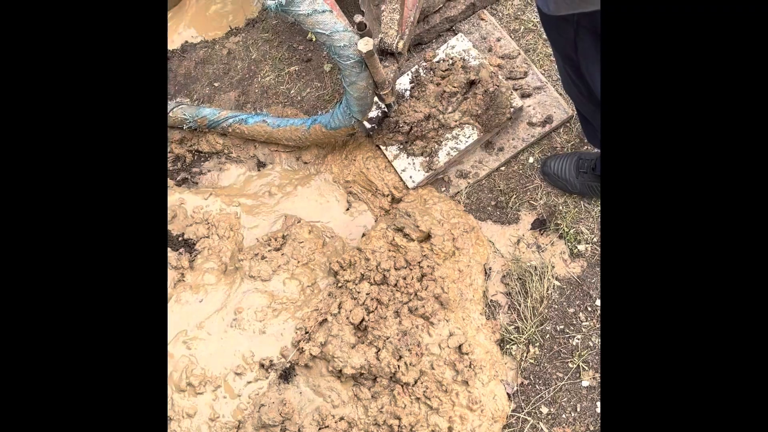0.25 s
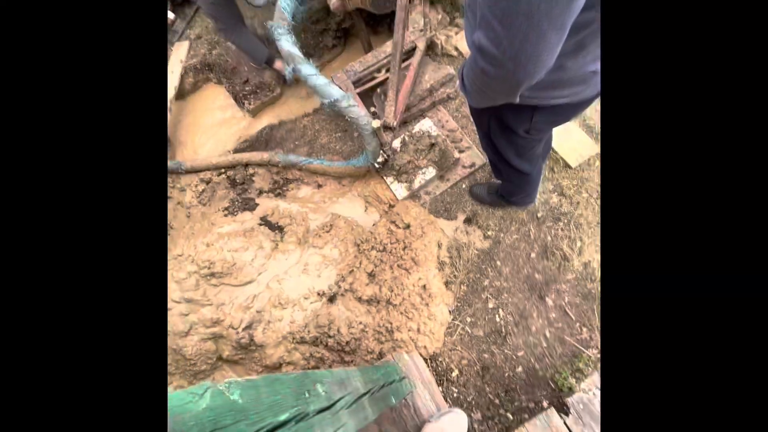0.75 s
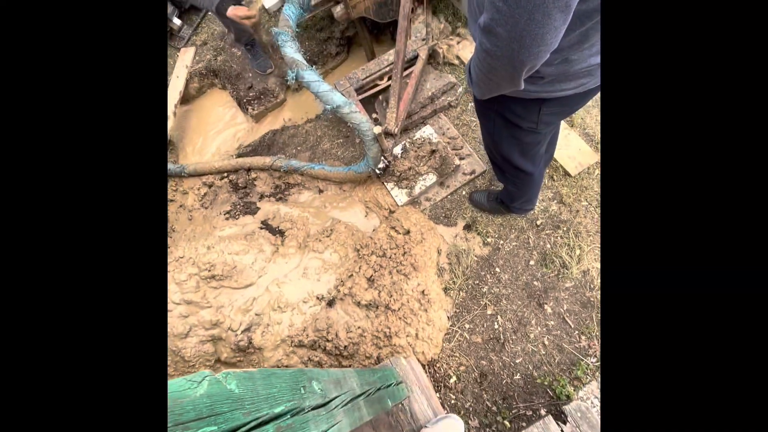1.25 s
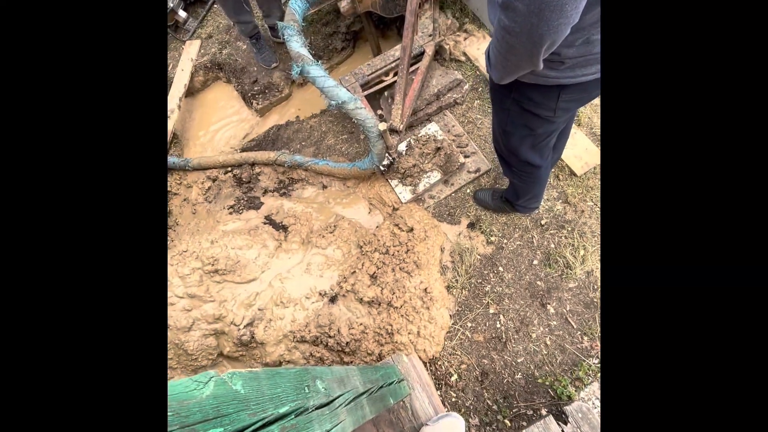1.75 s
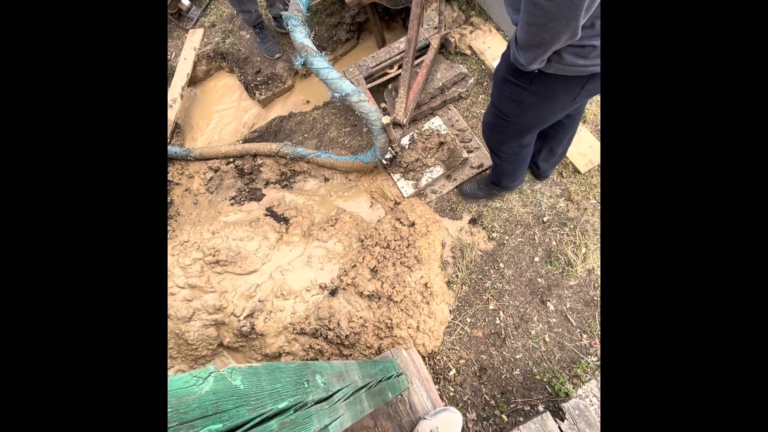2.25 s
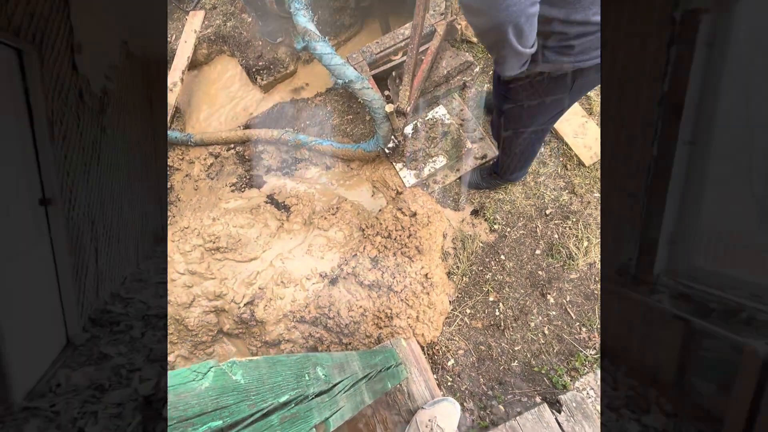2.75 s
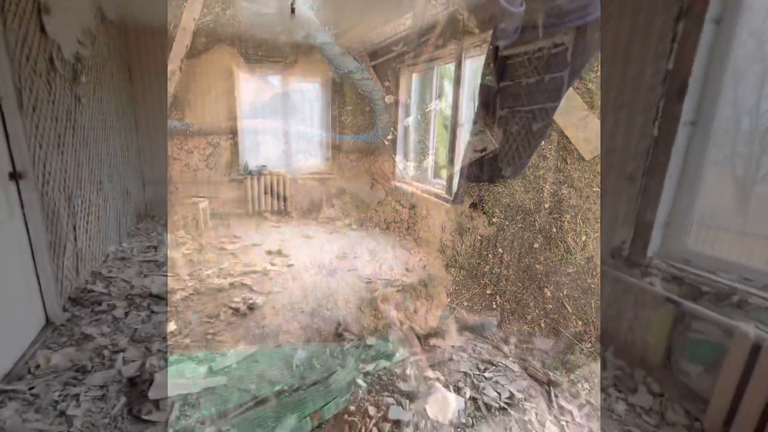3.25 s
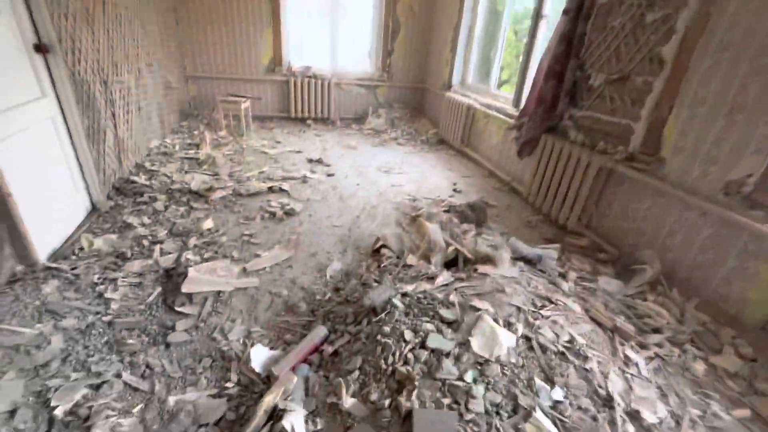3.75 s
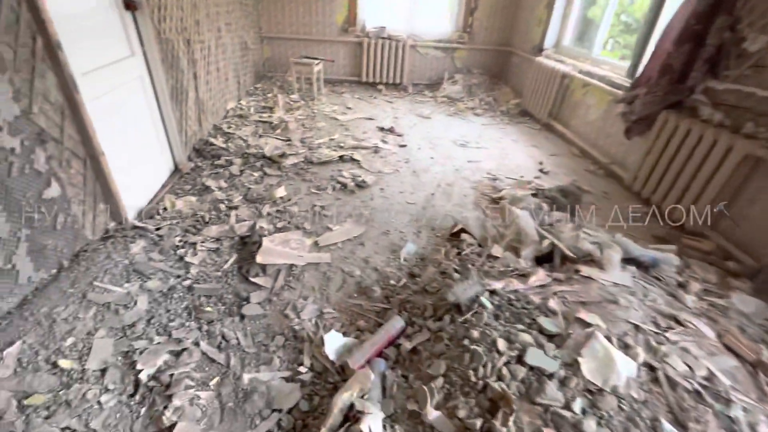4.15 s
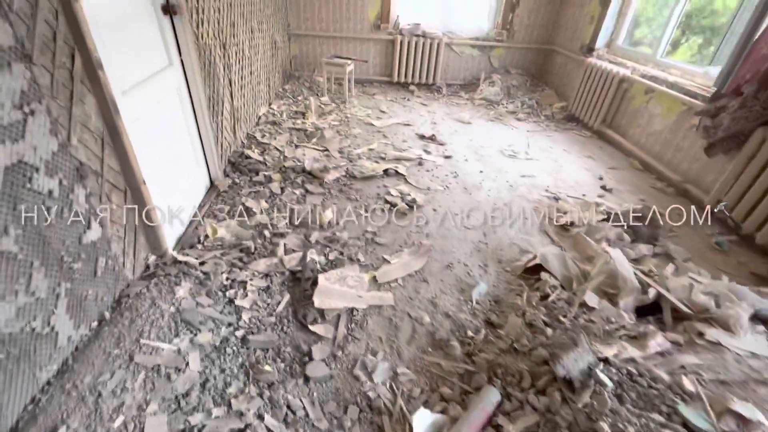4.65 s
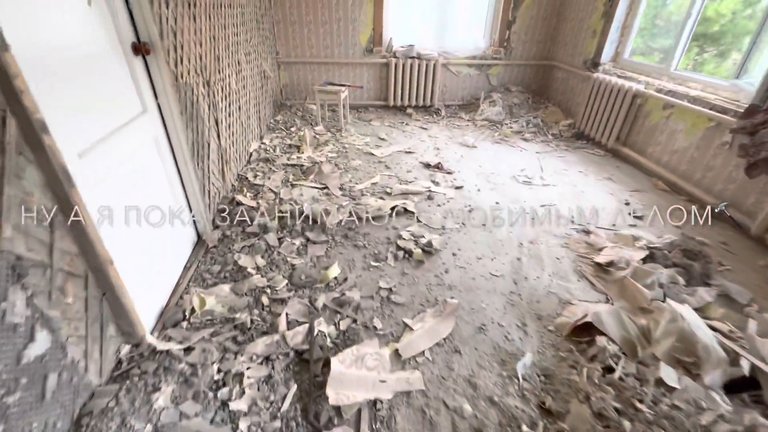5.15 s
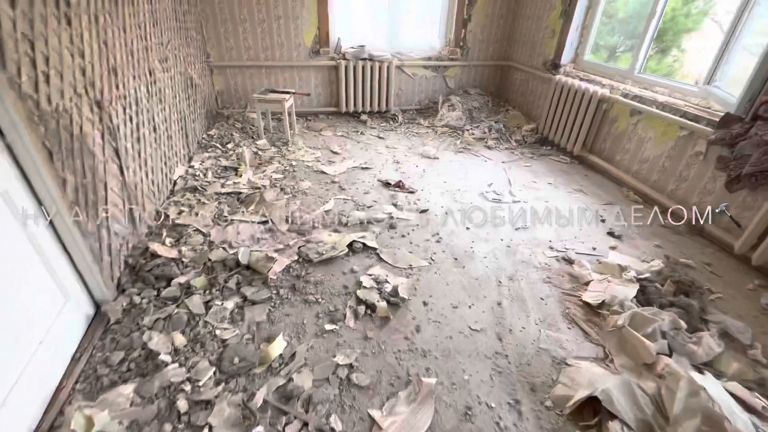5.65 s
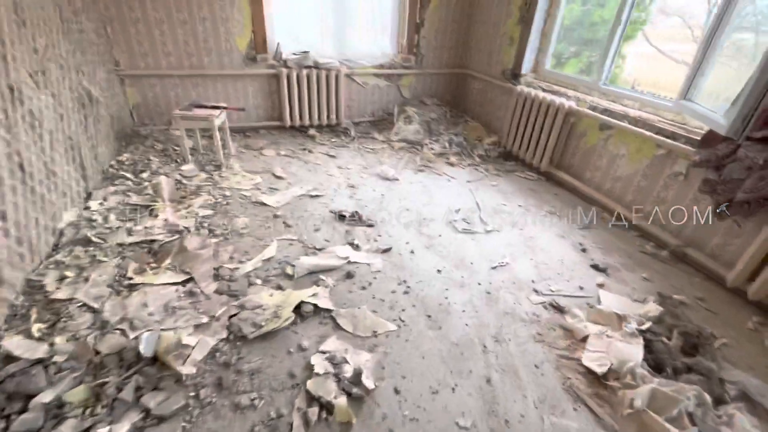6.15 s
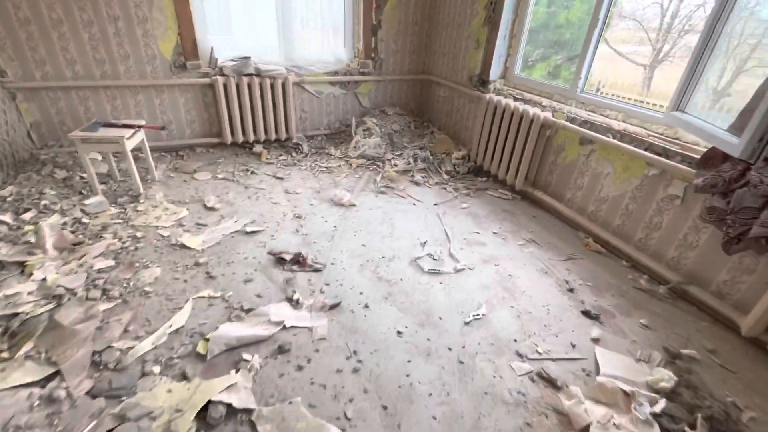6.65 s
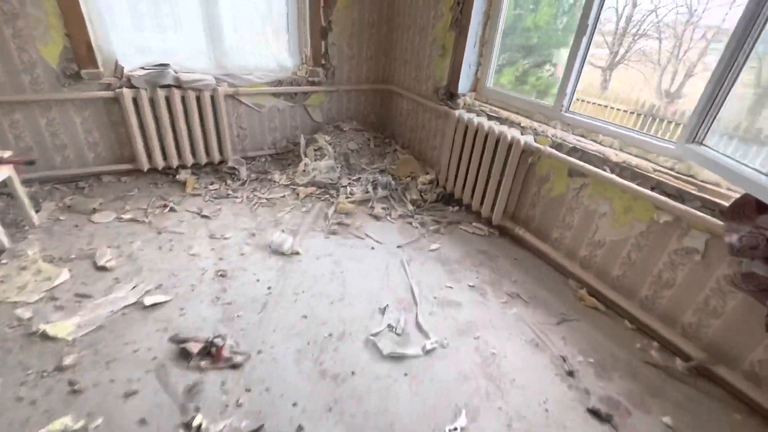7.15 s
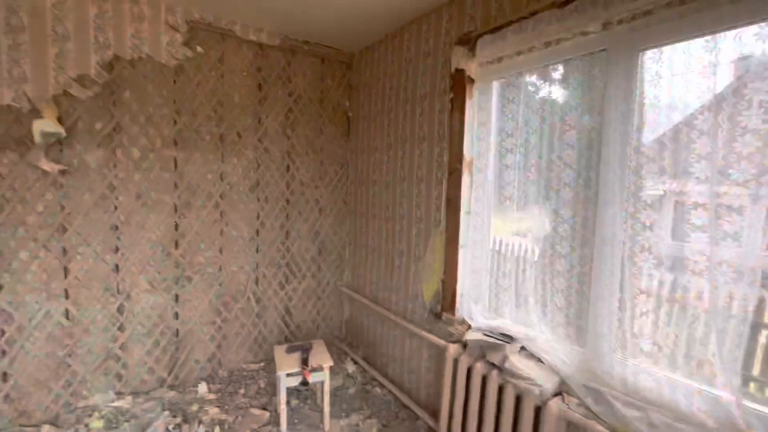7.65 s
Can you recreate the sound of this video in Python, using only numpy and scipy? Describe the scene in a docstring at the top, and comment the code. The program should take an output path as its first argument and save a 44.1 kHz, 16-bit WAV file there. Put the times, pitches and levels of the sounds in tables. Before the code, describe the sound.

A single-cylinder engine driving a drilling rig chugs fast and loud close by in a yard, with pump throb, metallic clatter and high hiss. The microphone backs off slightly, then the machine fades smoothly under a quiet bare room. Someone walks slowly over debris: dull board thuds, gritty plaster crunches, snapping chips, a skittering shard, a rocking slab knocking, and a final dry crack.

```python
"""Drilling rig in a yard, then steps in a derelict room

A one-cylinder engine drives a well-drilling rig, with a mud pump and a drive beating against it: summed
harmonics, with noise and ringing metal that swell at each firing. The rig fades away; then someone walks
through a bare room. Each step thuds on ringing boards and crunches plaster and paper as bursts of grainy
noise; chips snap as resonant clicks, a loose slab rocks in damped modes and clothes rustle."""
import sys
import numpy as np
from scipy import signal
from scipy.fft import rfft, irfft
from scipy.io import wavfile

SR = 44100
rng = np.random.default_rng(int(sys.argv[2]) if len(sys.argv) > 2 else 0)


def dump_mix(stems):
    """Bounce the given channels to the path in sys.argv[1] as a 16-bit WAV at rate SR."""
    frames = np.atleast_2d(stems).T  # one column per channel
    limited = np.clip(frames, -1, 1)  # hard clip at full scale
    pcm = np.round(limited * 32767).astype(np.int16)
    wavfile.write(sys.argv[1], SR, pcm)


N = 348829
T, HZ = np.arange(N) / SR, np.fft.rfftfreq(N, 1 / SR)

# stereo likeness of left and right for the rig: (frequency [Hz], likeness [-1..1])
RIG_SAME = [(60, 0.77), (300, 0.89), (550, 0.25), (850, 0.13), (1100, 0.72), (1500, 0.32), (3500, 0.18),
            (5000, 0.57), (6100, 0.91), (7200, 0.81), (9000, 1), (11000, 1)]
# stereo likeness of left and right for the room: (frequency [Hz], likeness [-1..1])
ROOM_SAME = [(60, 0.79), (290, 0.9), (700, 0.65), (1400, 0.98), (3100, 0.037), (7000, 0.081), (12000, 0.9)]
# phase between left and right for the room: (frequency [Hz], phase [rad])
ROOM_PHASE = [(0, 0), (900, 1.3), (1500, 1), (2800, 2.4), (5000, 7), (7200, 12), (10500, 12.6),
              (16000, 12.6)]
# a heel or a sole coming down on rubble: (time [s], floor thud [dB], crushing [dB], fine grit [dB],
# rise [s], decay [s], pitch [factor], jumps in level [dB])
STEPS = [ (3.533, -46, -36, -39, 0.022, 0.067, 0.98, 0), (3.59, -51, -60, -43, 0.017, 0.053, 1.3, 1),
         (3.7, -49, -52, -42.5, 0.047, 0.042, 1.4, -2), (4.291, -43, -27.5, -33.5, 0.012, 0.033, 1.1, 2),
         (4.319, -38, -31.5, -35, 0.003, 0.073, 0.89, 2.5), (4.375, -38, -37, -46, 0.014, 0.093, 0.63, 0),
         (4.512, -36.5, -29, -31.5, 0.003, 0.028, 1.34, 2),
         (4.558, -39.5, -41, -56, 0.0054, 0.057, 0.82, 1), (5.17, -49, -38.5, -47, 0.016, 0.059, 0.71, 0),
         (5.871, -38, -39.5, -41.5, 0.011, 0.17, 0.7, 1.5),
         (5.944, -35.5, -41, -42, 0.0024, 0.077, 0.98, 3),
         (6.553, -46, -47, -33.5, 0.0015, 0.058, 1.06, 1.5),
         (6.6, -60, -28.5, -30, 0.013, 0.06, 0.92, -0.5), (6.635, -60, -32.5, -38, 0.023, .04, 0.76, 4),
         (6.675, -54, -39, -31.5, 0.027, 0.026, 0.61, 0.5), (7.187, -43, -44, -36.5, 0.0063, 0.1, 0.7, 0.5),
         (7.313, -38, -34, -42, 0.0086, 0.053, 1.26, 2)]


def gain_of(db):
    """Decibels to amplitude."""
    return 10 ** (np.asarray(db) / 20)


def evened(x):
    """Scaled to rms 1."""
    return x / np.sqrt(np.mean(x ** 2) + 1e-20)


def read(points, hz):
    """A table over log frequency."""
    f, value = np.transpose(points)
    return np.interp(np.log(hz + 1), np.log(f + 1), value)


def curve(rows):
    """A table over time."""
    return np.interp(T, *np.transpose(rows))


def ramp(start, full):
    """A straight fade from 0 at start to 1 at full; it runs backwards if full comes first."""
    return np.clip((T - start) / (full - start), 0, 1)


def swell(s, half_width):
    """A smooth bump of height 1 around s."""
    return np.exp(-((T - s) / half_width) ** 2)


def coloured(x, spectrum):
    """Gives x a spectrum, at rms 1."""
    return evened(irfft(rfft(x) * gain_of(read(spectrum, HZ)), N))


def wander(hz):
    """Slow chance of rms 1, up to about hz."""
    return evened(irfft(rfft(rng.standard_normal(N)) * np.exp(-(HZ / hz) ** 2), N))


def pair(x, likeness):
    """Makes two unrelated channels partly alike."""
    a, b = rfft(x)
    same = np.clip(read(likeness, HZ), -1, 1)
    return irfft(np.array([a, same * a + np.sqrt(1 - same ** 2) * b]), N)


def noise(spectrum, likeness, envelope=1):
    """Stereo noise, gated and then coloured."""
    return coloured(pair(rng.standard_normal((2, N)) * envelope, likeness), spectrum)


def stereo_image(x, phase, side_db):
    """The right channel is turned in phase at each frequency, and the two channels differ in level."""
    gains = gain_of(read(side_db, HZ) * np.array([[.5], [-.5]]))
    turn = np.exp(1j * np.interp(HZ, *np.transpose(phase)) * np.array([[0], [-1]]))
    return irfft(rfft(x) * turn * gains / np.sqrt(np.mean(gains ** 2, 0)), N)


def grains(per_s, spread_db, bed):
    """Tiny fractures of very different sizes over a bed of scraping, as an envelope."""
    sizes = gain_of(spread_db * np.minimum(rng.exponential(1, N), 4))
    sizes = sizes * (rng.random(N) < per_s / SR)
    decay = np.exp(-1 / (0.000094 * SR))
    return np.sqrt(bed + evened(signal.lfilter([1], [1, -decay], sizes ** 2)))


def click(colour_db, size=2048):
    """A sharp click of peak 1 that rings out, at minimum phase, with a colour (a function from Hz to dB)."""
    log_gain = np.log(gain_of(colour_db(abs(np.fft.fftfreq(size, 1 / SR)))))
    wave = np.fft.ifft(np.exp(np.conj(signal.hilbert(log_gain)))).real
    return wave / abs(wave).max()


def pings(per_s, cycles, spread_db, count=24):
    """Small pieces each ring for a few cycles at one of several pitches, each with its own stereo balance."""
    out, t = np.zeros((2, N)), T[:1024]
    for hz in np.geomspace(400, 12000, count):
        hits = rng.integers(N, size=round(per_s * N / SR / count))
        size = gain_of(spread_db * np.minimum(rng.exponential(1, len(hits)), 3))
        sign = rng.choice([-1, 1], len(hits))
        balance = 1 + .5 * rng.standard_normal((2, len(hits)))
        train = np.zeros((2, N))
        train[:, hits] = size * sign * balance
        ring = hz * np.sin(2 * np.pi * hz * t) * np.exp(-t * hz / cycles)
        out += signal.oaconvolve(train, ring[None], axes=1)[:, :N]
    return evened(out)


def air(dip_db):
    """The bare room's own noise, a broad hush whose strength flutters."""
    # (frequency [Hz], density [dB per Hz])
    air_spectrum = [(20, -10), (58, 8), (110, -4.5), (300, -5), (600, 0.5), (1000, 1.5), (1600, -3.5),
                    (2600, -12.5), (5000, -21), (8000, -40), (14000, -55)]
    # (time [s], level [dB])
    air_level = [(3.5, -46.5), (3.85, -47), (4.25, -51.5), (4.7, -46), (5.1, -46.5), (5.7, -50.5),
                 (6.5, -50), (6.8, -48), (7.4, -46.5), (7.7, -49.5)]
    flutter = gain_of(1.2 * wander(17))
    return gain_of(curve(air_level) + dip_db) * noise(air_spectrum, ROOM_SAME, flutter)


def clothes_and_hiss(dip_db):
    """A rustle of tiny grains sinks deeper in each dip; from about 7.67 s on it is heard as a louder hiss."""
    # (frequency [Hz], density [dB per Hz])
    cloth_spectrum = [(500, -18), (2000, 3.5), (3500, 3.5), (4700, -2), (6200, 0), (7500, -6),
                      (11000, -12.5), (15000, -24)]
    late_hiss_db = 5.5 * ramp(7.66, 7.68)
    level_db = -54.5 + 2.5 * dip_db + late_hiss_db
    return gain_of(level_db) * noise(cloth_spectrum, ROOM_SAME, grains(1300, spread_db=11, bed=0.42))


def background():
    """Room noise and rustle fade in together, dip twice, and drop out for an instant near 7.66 s."""
    # two dips and the short dropout: (middle [s], half-width [s], depth [dB])
    dip_rows = [(3.97, 0.11, -4), (5.815, 0.071, -8), (7.657, 0.01, -28)]
    # left over right: (frequency [Hz], level difference [dB])
    room_side = [(300, -1), (600, -5), (1100, 1), (2000, -0.5), (5000, 3), (8000, 2.5), (9500, -0.5)]
    dip_db = sum(db * swell(s, half_width) for s, half_width, db in dip_rows)
    bed = ramp(3.4014, 3.444) * (air(dip_db) + clothes_and_hiss(dip_db))
    return stereo_image(bed, ROOM_PHASE, room_side)


def harmonics(turns, levels_db, lags, unsteady, force_db=0):
    """A machine's lines; lags are in turns. Uneven strokes shake each line; force drives the highest most."""
    shakes = np.array([.85 * wander(12.2) + .7 * wander(2.5) + 1j * wander(13) for _ in range(3)])
    total = 0
    for k, (db, lag) in enumerate(zip(levels_db, lags)):
        level = gain_of(db + force_db * (k / len(levels_db)) ** 2)
        line = np.exp(2j * np.pi * ((k + 1) * turns - lag))
        shake = np.roll(shakes[k % len(shakes)], rng.integers(N))
        total = total + level * line * (1 + unsteady * shake)
    return np.sqrt(2) * total.real


def burst(turns, place, length, uneven_db):
    """A quick swell and decay once a cycle (place and length in turns), each of its own strength."""
    count, age = np.divmod(turns - place + 1, 1)
    strength = gain_of(uneven_db * rng.standard_normal(256))[count.astype(int) % 256]
    return strength * age / length * np.exp(-age / length)


def knock(turns, spectrum, blows, alike):
    """Each firing shakes the metal in much the same way, so part of its clatter repeats."""
    size = 1575  # samples of clatter spread over one cycle
    pattern = rng.standard_normal((2, size))[:, (turns % 1 * size).astype(int)]
    alike = np.clip(alike, 0, 1)
    clatter = np.sqrt(alike) * pattern + np.sqrt(1 - alike) * rng.standard_normal((2, N))
    return coloured(pair(clatter * blows, RIG_SAME), spectrum)


def slap(turns, force_db, count=12):
    """The piston slaps the cylinder at each firing: a click, a little early or late, in one of a few colours."""
    # (frequency [Hz], level [dB])
    slap_spectrum = [(300, -25), (780, -8.5), (980, 11.5), (1150, 9), (1400, -2), (2000, -5), (3000, -9),
                     (5000, -19), (14000, -43)]
    jitter = .015 * wander(20)  # cycles
    fired = np.diff(np.floor(turns - .915 + jitter), prepend=-1) > 0
    knots, which = np.arange(0, SR / 2, 250), rng.integers(count, size=N)
    colours_db = 4 * rng.standard_normal((count, len(knots)))
    total = 0
    for k, own_db in enumerate(colours_db):
        wave = evened(click(lambda hz: read(slap_spectrum, hz) + np.interp(hz, knots, own_db)))
        blows = fired * (which == k) * gain_of(force_db)
        total = total + signal.oaconvolve(blows, wave)[:N]
    return evened(total)


def machine_lines(turns, force_db):
    """The steady lines of engine, pump and drive, whose unequal speeds beat against each other."""
    # one level per harmonic, from the first: (level [dB])
    engine_db = [-38, -13.5, -12.5, -34, -15, -11, -17.5, -27, -18.5, -27, -18, -18, -34, -43, -32.5, -26.5,
                 -19, -23, -26, -30, -25, -49, -25.5, -28.5, -43, -27.5, -50, -29.5, -32.5, -47, -48, -25.5,
                 -29.5, -24.5, -24.5, -23, -21.5, -24, -26, -26.5, -21.5, -21, -35]
    # likewise for the mud pump: (level [dB])
    pump_db = [-70, -25, -40, -17.5, -20.5, -16.5, -34, -20, -29.5, -9.5, -25, -18, -18.5, -19, -54, -31,
               -44, -25.5]
    # likewise for the drive: (level [dB])
    drive_db = [-49, -19.5, -23, -23.5, -16, -16.5, -23, -50]
    # the lag each engine harmonic adds to the one below; these steps sum to its phase:
    # (harmonic [number], share of a cycle [turns])
    arrival = [(2, 0.1952), (11, 0.2135), (15, 0.598), (25, 0.636), (30, 0.9335), (43, 0.913)]
    pump_hz, drive_hz = 26.19, 24.67
    strokes = pump_hz * T + .024 * wander(0.89)
    order = np.arange(len(engine_db)) + 1
    # pipe and ground scatter the low harmonics over the cycle; the high ones stay bunched as a knock
    scatter = rng.standard_normal(len(order)) * 0.31 * np.exp(-order / 18)
    lags = np.cumsum(np.interp(order, *np.transpose(arrival))) + scatter
    lines = harmonics(turns + 0.0025 * wander(13), engine_db, lags, unsteady=.22, force_db=force_db)
    lines += harmonics(strokes, pump_db, rng.random(len(pump_db)), unsteady=.19)
    drive_turns = drive_hz * T + 0.016 * wander(0.97)
    return lines + harmonics(drive_turns, drive_db, rng.random(len(drive_db)), unsteady=0.083)


def metalwork(turns, force_db, ringing):
    """Block, panels and exhaust answer each firing with coloured clatter; loose fittings rattle after it."""
    # the engine block: (frequency [Hz], density [dB per Hz])
    block_spectrum = [(300, -31), (520, 1), (780, -10), (1020, 9.5), (1170, 9.5), (1330, -17), (1800, -2),
                      (2200, -22), (2500, -5.5), (3000, -11), (4000, -15.5), (4700, -21), (8000, -19),
                      (15000, -38)]
    # sheet panels: (frequency [Hz], density [dB per Hz])
    panel_spectrum = [(900, -30), (1450, -0.5), (1800, 3), (2150, 2.5), (2500, -10), (2900, 0.5),
                      (3700, -17.5), (4700, -12), (7000, -15), (14000, -27.5)]
    # exhaust puffs: (frequency [Hz], density [dB per Hz])
    exhaust_spectrum = [(200, -19), (400, 0), (520, 7), (700, -5), (900, -11), (2000, -50)]
    # loose fittings: (frequency [Hz], density [dB per Hz])
    fitting_spectrum = [(300, -15), (800, 0), (1300, 3.5), (2500, -4), (3400, -11), (4500, -11),
                        (9000, -23), (14000, -46)]
    firing = burst(turns, place=.885, length=.052, uneven_db=1.5)
    valve = burst(turns, place=0.32, length=0.027, uneven_db=1.5)
    puff = burst(turns, place=0.597, length=0.069, uneven_db=4.0)
    shaking = .15 + burst(turns, place=.89, length=.09, uneven_db=2)
    block = gain_of(-19.0) * knock(turns, block_spectrum, firing + 0.5 * valve, alike=0.24)
    panels = gain_of(-21) * knock(turns, panel_spectrum, ringing * gain_of(force_db / 2), alike=0.12)
    exhaust = gain_of(-19.5) * knock(turns, exhaust_spectrum, puff, alike=0.15)
    rattle = coloured(pings(900, cycles=3, spread_db=2) * shaking, fitting_spectrum)
    return block + panels + exhaust + gain_of(-21.5) * rattle


def churning(nearness_db):
    """Machinery churns as broad, unsteady noise, which gains most from close by."""
    # (frequency [Hz], density [dB per Hz])
    churn_spectrum = [(20, -16), (45, -20), (80, -1.5), (160, -6), (310, -1), (450, -1.5), (700, -5.5),
                      (1050, -6.5), (1350, -10), (2000, -15.5), (3000, -16), (5000, -26.5), (9000, -27.5),
                      (15000, -44.5)]
    closer_db = nearness_db - nearness_db[-1]
    return gain_of(-10.0 + 0.14 * closer_db) * noise(churn_spectrum, RIG_SAME, gain_of(1.62 * wander(45)))


def hissing(turns, ringing):
    """A high hiss puffs twice a cycle over a steady part."""
    # (frequency [Hz], density [dB per Hz])
    spray_spectrum = [(2000, -31), (4500, 9), (6000, 7.5), (8100, -1), (8600, 0.5), (9200, -4), (11000, -2),
                      (13000, -3.5), (15700, -2)]
    puffs = .28 + .45 * ringing + .7 * burst(turns, place=.15, length=.075, uneven_db=2)
    return gain_of(-21.5) * noise(spray_spectrum, RIG_SAME, puffs)


def rig():
    """The firing cycle drives every part of the engine; pump, drive and churning run beside it."""
    # the listener backs away in two moves, then the rig regains a little: (time [s], level [dB])
    nearness = [(.43, -11), (.52, -13), (1.15, -14), (1.45, -16), (2.15, -17), (2.6, -14.5)]
    # phase between left and right: (frequency [Hz], phase [rad])
    rig_phase = [(0, 0), (350, 0), (720, .4), (1050, 3.6), (1450, 4.2), (1800, 5.6), (2150, 6), (2400, 8.4),
                 (3700, 10.6), (4800, 9.1), (6100, 9.5), (7800, 12.4), (8700, 12.8), (9800, 15.3),
                 (10800, 16.1), (11900, 18.6), (13200, 19.1), (14200, 21.8), (16000, 22.2)]
    # left over right: (frequency [Hz], level difference [dB])
    rig_side = [(60, 0.5), (200, 1.3), (380, 2), (600, 9.5), (800, 5), (1000, 10), (1500, 2.5), (2050, 9),
                (2600, 0), (4400, 2), (7000, -0.5)]
    engine_hz, start_turn = 28.0, .075  # firings per s; place in the cycle at the start
    sag_hz = .65 * swell(2.25, half_width=.08)  # the load catches the engine once
    turns = start_turn + np.cumsum(engine_hz - sag_hz) / SR
    # no two firings are alike in force
    forces = np.clip(rng.standard_normal(256), -2, 2)
    force_db = 1.2 * np.interp(turns - .9, np.arange(256), forces)
    ringing = burst(turns, place=.88, length=.064, uneven_db=1.1)
    nearness_db = curve(nearness)
    machine = machine_lines(turns, force_db) + gain_of(-20) * slap(turns, force_db)
    machine = machine + metalwork(turns, force_db, ringing) + churning(nearness_db) + hissing(turns, ringing)
    # it opens subdued, jumps to full and later fades out evenly
    fade = np.maximum(ramp(0.044, 0.051), gain_of(-14.5)) * ramp(start=3.599, full=2.227)
    return stereo_image(machine, rig_phase, rig_side) * gain_of(nearness_db) * fade


def fragments(x, spectrum, pitch, ripple_db):
    """Every heap of rubble has narrow resonances of its own on top of the common spectrum."""
    hz = np.fft.rfftfreq(x.shape[1], 1 / SR)
    knots = np.geomspace(200, 16000, 220)
    ripple = np.interp(hz, knots, rng.standard_normal(len(knots)))
    return evened(irfft(rfft(x) * gain_of(read(spectrum, hz / pitch) + ripple_db * ripple)))


def scuffs():
    """A sole scuffing over dusty boards: swelling and sinking noise."""
    # (time of the peak [s], half-width [s], level [dB])
    scuff_rows = [(5.13, 0.057, -53), (5.345, 0.034, -41.5), (5.49, 0.062, -49.5), (6.275, 0.02, -55),
                  (6.455, 0.015, -47), (7.11, 0.1, -51.5), (7.21, 0.025, -41.5)]
    # (frequency [Hz], density [dB per Hz])
    slide_spectrum = [(1500, -7), (3300, -8), (3750, -6), (4000, 4), (4300, -1), (4650, -3), (5300, 2),
                      (6200, 0), (7200, -9), (9500, -16), (14000, -35)]
    scuffing = sum(gain_of(db) * swell(s, half_width) for s, half_width, db in scuff_rows)
    return scuffing * noise(slide_spectrum, ROOM_SAME)


def scraps():
    """Scraps of paper and plaster slide and settle in short, soft rustles between the steps."""
    # (time [s], level [dB], decay [s], pitch [factor])
    shift_rows = [(6.25, -43, 0.021, 1.2), (6.282, -38, 0.014, 0.78), (6.438, -49, 0.027, 1.3),
                  (6.963, -37, 0.024, 0.77), (7.519, -54, .025, 1.2)]
    # (frequency [Hz], density [dB per Hz])
    scrap_spectrum = [(300, -20), (900, -7), (1600, 2), (2400, -11), (5000, -14.5), (14000, -43)]
    out, t = np.zeros((2, N)), T[:SR // 5]
    crinkle = pair(rng.standard_normal((2, N)) * grains(500, spread_db=4, bed=.6), ROOM_SAME)
    for s, db, decay, pitch in shift_rows:
        span = np.s_[:, round(s * SR):round(s * SR) + len(t)]
        shape = np.minimum(t / 0.0032, 1) * np.exp(-t / decay)
        out[span] += gain_of(db) * shape * fragments(crinkle[span], scrap_spectrum, pitch, ripple_db=8.5)
    return out


def struck(hits, modes, crack_db):
    """A loose object rings with its damped modes, with a short gritty crack at the blow."""
    out, t = np.zeros((2, N)), T[:SR // 5]
    for s, level_db, pitch in hits:
        ring = sum(gain_of(db - 60 * t / t60) * np.sin(2 * np.pi * hz * pitch * t) for hz, db, t60 in modes)
        crack = gain_of(crack_db) * rng.standard_normal((2, len(t))) * np.exp(-t / .003)
        blow = np.minimum(t / 0.0013, 1) * (ring / abs(ring).max() + crack)
        out[:, round(s * SR):][:, :len(t)] += gain_of(level_db) * blow
    return out


def slab():
    """A loose slab rocks under the foot and knocks on the floor."""
    # (time [s], level [dB], pitch [factor])
    slab_hits = [(6.554, -22, 1.04), (6.5595, -18, 1.15), (6.5975, -14.5, 1.1), (6.6215, -14, 1.2),
                 (6.655, -25, 1.1), (6.686, -22, 1.75)]
    # (frequency at pitch 1 [Hz], level [dB], t60 [s])
    slab_modes = [(397, -7, 0.065), (512, 7, 0.046), (587, 4, 0.061), (744, -6, 0.058), (965, -14, .03),
                  (1405, -20, .024)]
    return struck(slab_hits, slab_modes, crack_db=-23)


def shard():
    """A hard shard is kicked and skitters on, ringing high."""
    # (time [s], level [dB], pitch [factor])
    shard_hits = [(4.5135, -19.5, 1.0), (4.5225, -30, 0.95), (4.531, -31, 0.86), (4.547, -40, 1.0),
                  (4.566, -31, 0.93)]
    # (frequency at pitch 1 [Hz], level [dB], t60 [s])
    shard_modes = [(3100, 12, 0.079), (3340, 5, 0.1), (4680, -8, 0.092), (4830, -9, 0.086),
                   (5642, -4, .025)]
    return struck(shard_hits, shard_modes, crack_db=-16)


def cracks():
    """A stiff flake cracks through under the foot in quick stages: dry, compact clicks."""
    # (time [s], peak [dB], pitch [factor])
    crack_rows = [(7.3107, -12, 0.89), (7.3113, -12.5, 0.88), (7.3121, -14, 1.14), (7.3129, -13, 0.86),
                  (7.3187, -19, 1.1)]
    # (frequency at pitch 1 [Hz], level [dB])
    flake_spectrum = [(100, -26), (400, -2), (650, 0), (1100, 2), (1500, -4), (2100, 1), (2500, -3),
                      (2900, -11), (5000, -25), (12000, -42)]
    out = np.zeros(N)
    for s, peak_db, pitch in crack_rows:
        wave = click(lambda hz: read(flake_spectrum, hz / pitch))
        out[round(s * SR):][:len(wave)] += gain_of(peak_db) * wave
    return out


def chips(count=2):
    """A few smaller chips give way at random after each contact, as rows like those of the loud snaps."""
    delay_scale, middle_db, middle_hz, octaves = 0.06, -35, 2200, 1.1  # the delay scale in s
    chance = rng.standard_normal((len(STEPS) * count, 4))
    contacts = np.repeat([row[0] for row in STEPS], count)
    rows = []
    for s, (a, b, loud, high) in zip(contacts, chance):
        moment = min(s + delay_scale * np.hypot(a, b), T[-1])
        rows.append((moment, middle_db + 3 * loud, middle_hz * 2 ** (0.63 * high), octaves))
    return rows


def snaps():
    """A breaking chip: a click with a broad resonance, narrow ones of its own and a few ms of splintering."""
    # the loudest chips and splinters, and single grains ticking:
    # (time [s], peak [dB], pitch [Hz], spread [octaves, taken as at least 0.5])
    snap_rows = [ (3.441, -22.5, 900, 0.7), (3.539, -23, 1290, 1.2), (4.057, -40, 3000, 2),
                 (4.16, -35, 5020, 1.5), (4.183, -41, 3500, 1.5), (4.194, -31, 5000, 1.8),
                 (4.2635, -38, 7000, 1.3), (4.3, -21, 895, 0.77), (4.3063, -22, 1300, .7),
                 (4.324, -13, 1300, 1.5), (4.332, -23, 1800, 1), (4.357, -24, 2200, 1.7),
                 (4.377, -27, 760, 0.5), (4.401, -26, 1300, 0.5), (4.409, -22.5, 1250, 0.48),
                 (4.416, -29, 1400, 0.62), (4.516, -21.5, 900, 0.5), (4.6655, -33, 9000, 1.1),
                 (4.688, -28, 3500, 0.82), (5.18, -31, 374, 0.4), (5.206, -26, 2190, 1.3),
                 (5.345, -45, 9000, 1.2), (5.445, -39, 10000, 1), (5.666, -23, 1880, 1.12),
                 (5.874, -25, 850, 0.68), (5.885, -27, 2900, 1.1), (5.891, -24, 2500, 1.2),
                 (5.934, -27, 2500, 1.2), (5.948, -14, 3300, 0.66), (5.9515, -16.5, 3700, 0.64),
                 (5.955, -18, 3540, 0.77), (5.973, -22, 3600, 0.71), (5.981, -21, 3920, 0.75),
                 (6.012, -28, 2600, 1), (6.034, -26, 1050, 0.5), (6.063, -25, 950, 0.74),
                 (6.071, -26, 990, 0.78), (6.116, -32, 1300, 0.55), (6.126, -32, 1100, 1.1),
                 (6.152, -28.5, 2500, 2), (6.187, -37, 3000, 1), (6.251, -23, 3000, 2.1),
                 (6.286, -29, 1580, 0.7), (6.411, -26, 2610, 1.25), (6.4393, -26.5, 2600, 1.3),
                 (6.505, -37, 6000, 1), (6.607, -17, 2000, 1.5), (6.623, -17, 1800, 1.1),
                 (6.631, -16, 1600, 1.2), (6.657, -22, 980.8, 0.74), (6.967, -32, 1380, 0.52),
                 (7.3, -24, 1400, 0.65), (7.5207, -30, 1840, 1), (7.6267, -29, 2000, 1.3)]
    size = 2048
    out, t, knots = np.zeros((2, N)), T[:size], np.arange(0, SR / 2, 160)
    for s, peak_db, pitch_hz, octaves in snap_rows + chips():
        own_db = 2.6 * rng.standard_normal(len(knots))

        def colour_db(hz):
            """A broad hump around the pitch plus this chip's own ripple."""
            distance = np.log2((hz + 1) / pitch_hz) / max(octaves, .5)
            return np.interp(hz, knots, own_db) - 24.6 * np.log1p(distance ** 2 / 2)

        splintering = 0.13 * rng.standard_normal((2, size)) * np.exp(-t / 0.0038)
        snap = signal.fftconvolve(splintering + (t == 0), click(colour_db)[None], axes=1)[:, :size]
        part = out[:, round(s * SR):][:, :size]
        part += (gain_of(peak_db) * snap / abs(snap).max())[:, :part.shape[1]]
    return out


def thumps():
    """The floor gives under the weight and swings back a few times, at a pitch that depends on the spot."""
    # (time [s], level [dB], pitch [Hz], t60 [s])
    thump_rows = [(4.305, -36, 125, .25), (4.345, -33, 62, 0.32), (4.572, -31, 42, 0.17),
                  (4.574, -39.5, 110.3, .45), (4.615, -39, 28, .3), (5.174, -35.5, 99, 0.14),
                  (5.88, -37, 90, .15), (7.19, -33, 110, .18), (7.31, -40, 55, 0.69)]
    out, t = np.zeros(N), T[:SR // 2]
    for s, level_db, hz, t60 in thump_rows:
        swing = np.minimum(t / .005, 1) * np.sin(2 * np.pi * hz * t)
        out[round(s * SR):][:len(t)] += gain_of(level_db - 60 * t / t60) * swing
    return out


def steps():
    """Each footfall rings the boards, crushes lumps of plaster and grinds fine grit."""
    # modes of the floorboards: (frequency [Hz], level [dB], t60 [s])
    board_modes = [(58.5, -9.5, 0.89), (108, -6, 0.18), (125.6, -4, 0.14), (247, -5.5, 0.25)]
    # the push on the floor: (frequency [Hz], density [dB per Hz])
    thud_spectrum = [(15, -23), (35, -13), (58, 0), (95, -11), (150, -7.5), (260, -9), (450, -18.5),
                     (1200, -89.5)]
    # lumps of plaster: (frequency [Hz], density [dB per Hz])
    crush_spectrum = [(60, -14), (250, 2.5), (600, -1), (1200, 2.5), (1900, -2), (3000, -12.5), (6000, -44),
                      (14000, -41)]
    # fine grit: (frequency [Hz], density [dB per Hz])
    grit_spectrum = [(600, -21), (2000, 1), (3800, 3.5), (5500, -0.5), (7500, -4), (11000, -11),
                     (14000, -13), (16000, -81)]
    size, settle_s = 20000, 0.013  # samples per footfall; how fast the weight reaches the boards
    out, t = np.zeros((2, N + size)), T[:size]

    def material(envelope):
        """Noise gated by an envelope, doubled in length so that any stretch of it can be taken."""
        return np.tile(pair(rng.standard_normal((2, N)) * envelope, ROOM_SAME), 2)

    push = material(1)
    lumps = material(grains(380, spread_db=4, bed=0.18))
    dust = material(grains(600, spread_db=4, bed=0.35))
    clumps = np.tile(np.clip(wander(70), -1.5, 1.5), 2)  # rubble gives way in clumps
    crumbs = np.tile(pings(2200, cycles=4, spread_db=3.5), 2)
    lumps = evened(lumps) + 1.1 * crumbs
    dust = evened(dust) + .8 * crumbs[::-1]  # the crumbs with left and right swapped
    boards = sum(gain_of(db - 60 * t / t60) * np.sin(2 * np.pi * hz * t) for hz, db, t60 in board_modes)
    weight = np.clip(t / settle_s, 0, 1)
    for s, thud_db, crush_db, grit_db, rise, decay, pitch, jump_db in STEPS:
        span = np.s_[:, round(s * SR):round(s * SR) + size]
        shape = np.clip(t / rise, 0, 1) * np.exp(-np.maximum(t - rise, 0) / decay)
        start = rng.integers(N)
        stretch = np.s_[:, start:start + size]
        giving = gain_of(jump_db * clumps[start:start + size])
        thud = shape * fragments(push[stretch], thud_spectrum, 0.88, ripple_db=1.5)
        crush = shape * fragments(giving * lumps[stretch], crush_spectrum, pitch, ripple_db=4.0)
        grit = shape * fragments(giving * dust[stretch], grit_spectrum, np.sqrt(pitch), ripple_db=4.0)
        out[span] += gain_of(thud_db) * (weight * boards + 0.66 * thud)
        out[span] += gain_of(crush_db) * crush + gain_of(grit_db) * grit
    return out[:, :N]


def room(x):
    """Bare walls: sparse reflections, each band dying at its own speed."""
    # (frequency [Hz], t60 [s])
    room_t60 = [(60, 0.099), (300, 0.22), (1200, 0.13), (4000, 0.28), (12000, 0.19)]
    length = SR // 2
    sparse = rng.standard_normal((2, length)) * (rng.random((2, length)) < 3000 / SR)
    taps = sparse * (T[:length] > .006)
    hz, t, z = signal.stft(taps, SR, nperseg=256)
    tail = signal.istft(z * gain_of(-60 * t / read(room_t60, hz)[:, None]), SR, nperseg=256)[1]
    return signal.fftconvolve(x, tail / np.linalg.norm(tail[0]), axes=1)[:, :N]


def walk():
    """Everything the feet set off, heard directly and thrown back by the walls."""
    # left over right: (frequency [Hz], level difference [dB])
    feet_side = [(100, -0.5), (300, -2), (600, 3), (1100, 5.5), (2000, 0), (5000, 4.5), (8000, 3),
                 (9500, -0.5)]
    feet = steps() + thumps() + snaps() + cracks() + slab() + shard() + scraps() + scuffs()
    return stereo_image(feet + gain_of(-4.5) * room(feet), ROOM_PHASE, feet_side)


def scene():
    """The rig outdoors, fading into the walk indoors."""
    return background() + rig() + walk()


def record(dry):
    """The highest peaks are rounded off; then the recorder's band limit."""
    rounded = dry / (1 + (dry / .97) ** 6) ** (1 / 6)
    edge_hz = 15900
    lowpass = signal.firwin(511, edge_hz, window=("kaiser", 9), fs=SR)
    return signal.oaconvolve(rounded, lowpass[None], "same")


dry = scene()
out = record(dry)
dump_mix(out)
```